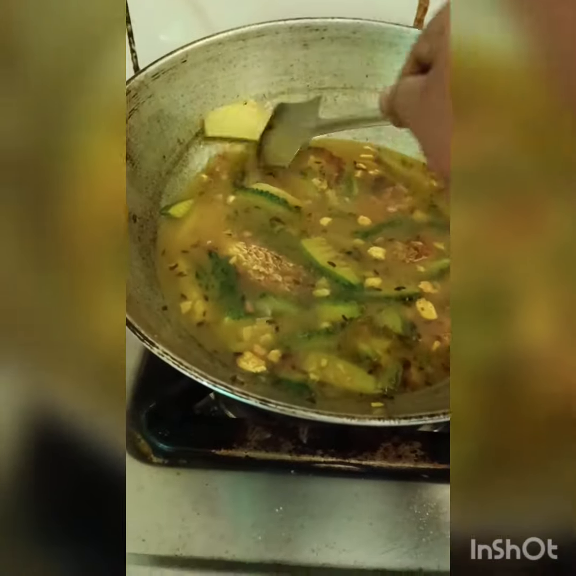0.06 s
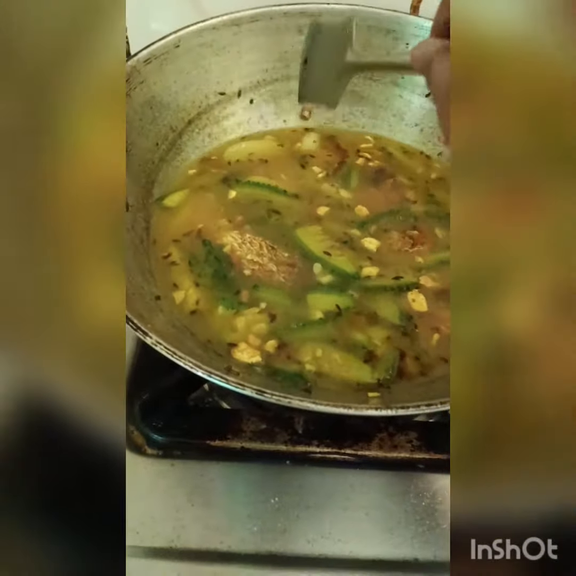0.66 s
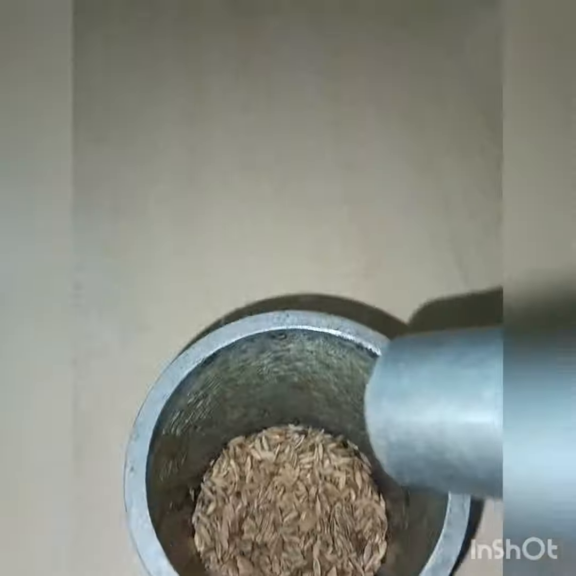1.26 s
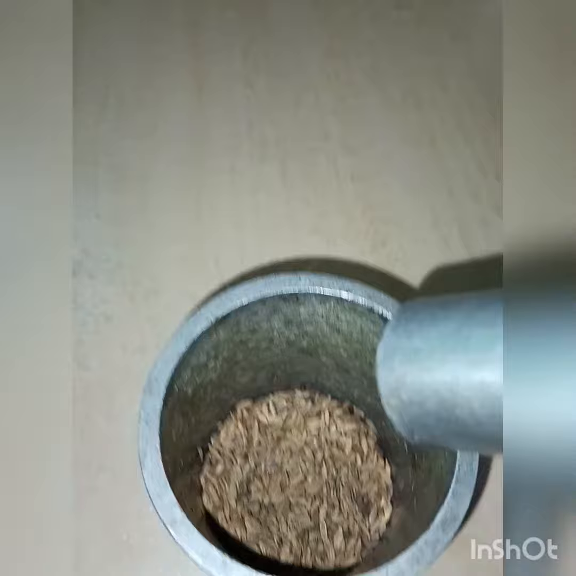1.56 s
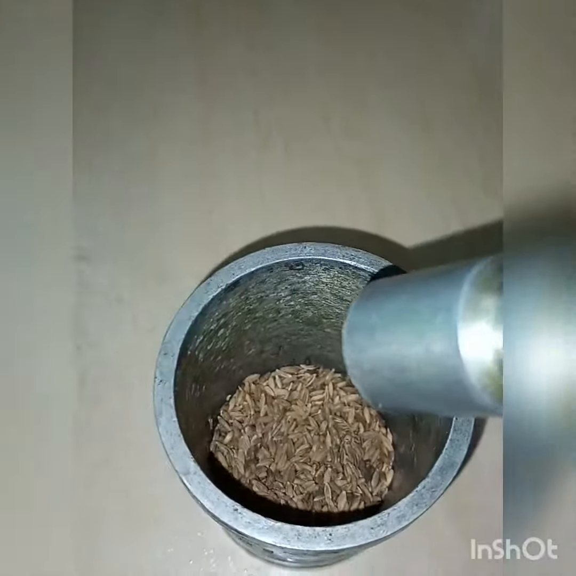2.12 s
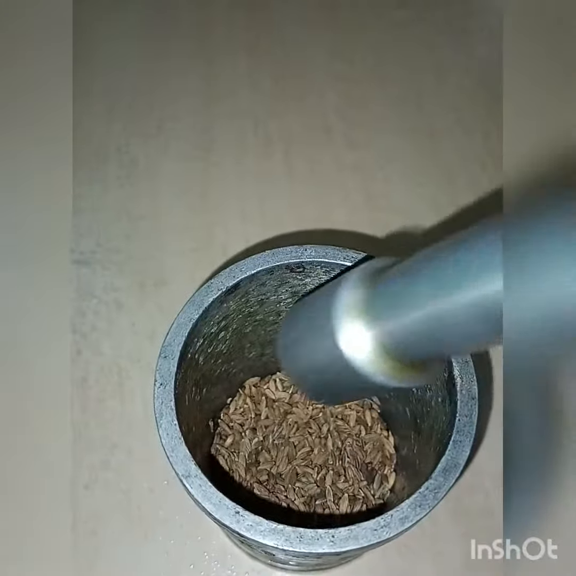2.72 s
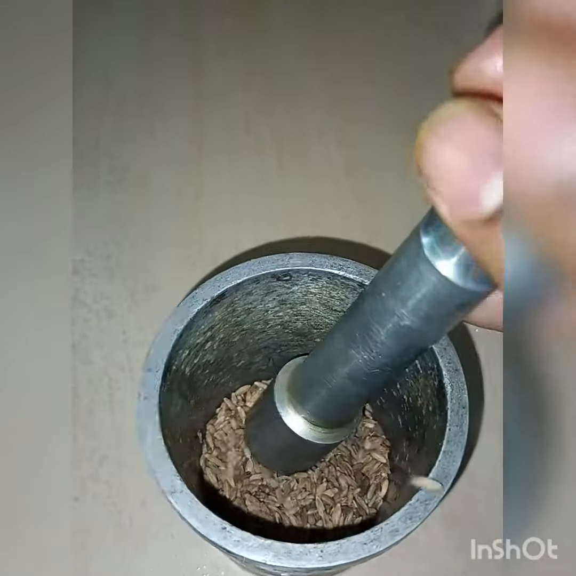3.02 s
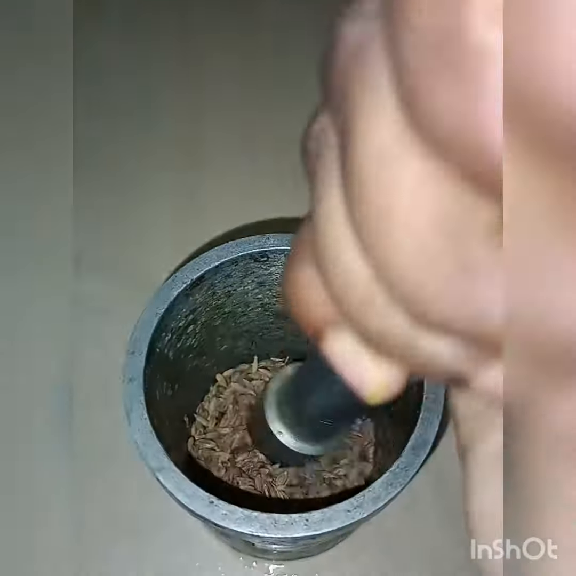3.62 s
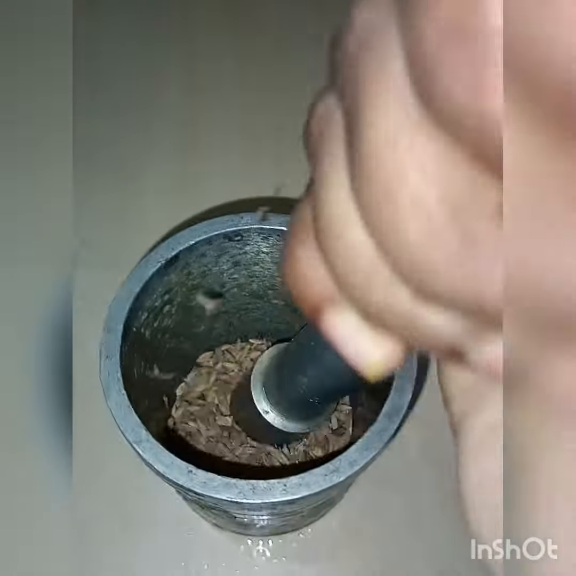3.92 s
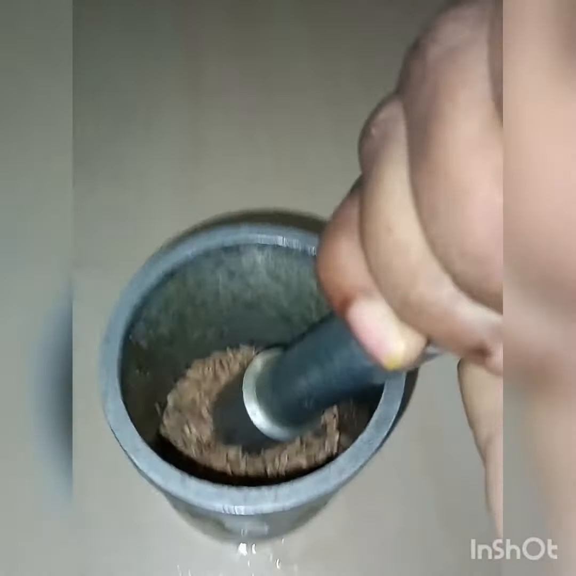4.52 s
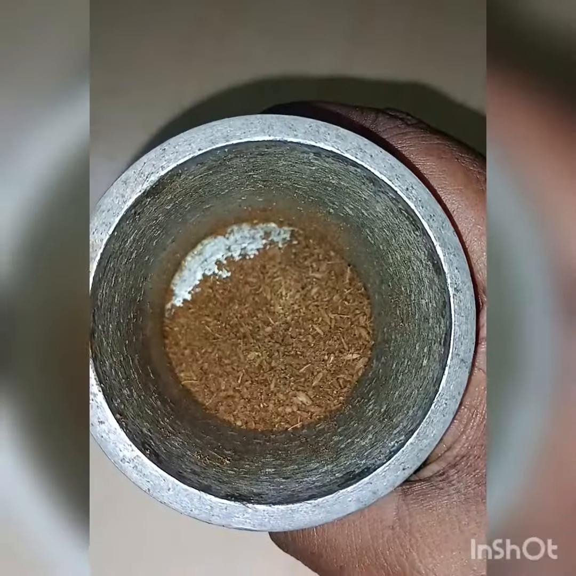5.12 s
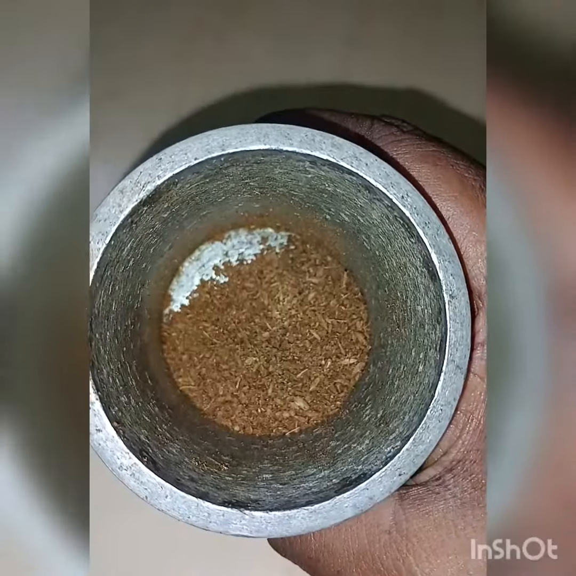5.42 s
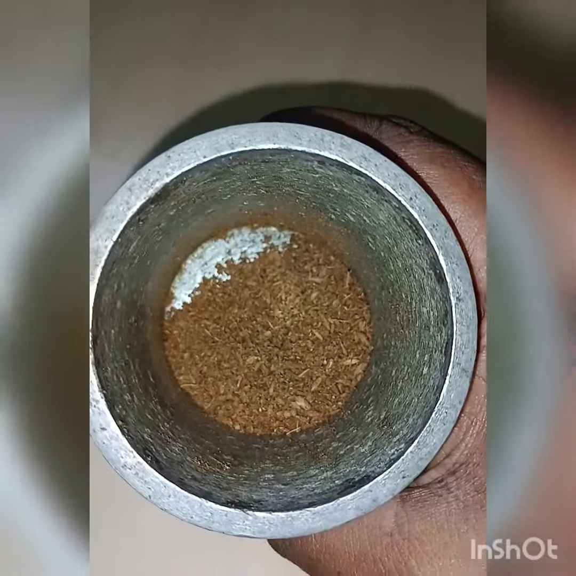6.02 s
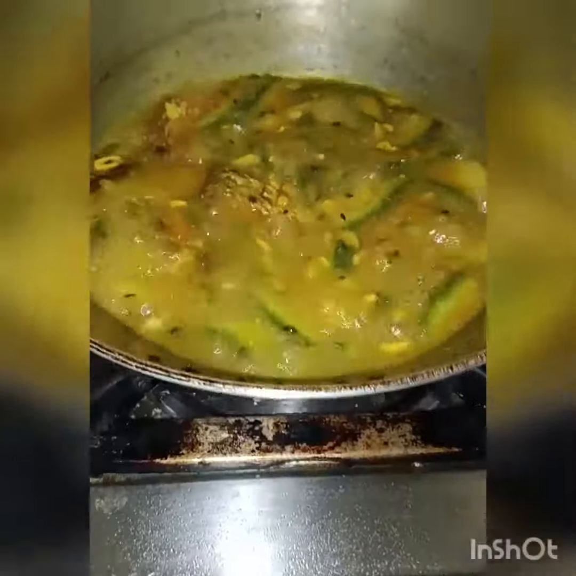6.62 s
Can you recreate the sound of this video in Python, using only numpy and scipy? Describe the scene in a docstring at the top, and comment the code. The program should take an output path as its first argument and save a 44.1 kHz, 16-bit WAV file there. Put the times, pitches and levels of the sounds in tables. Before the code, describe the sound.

Over a kitchen fan's hum, faint wok scrapes give way to a loud metal clang, pestle blows crunching spice, and finally simmering bubbles.

```python
"""Four short moments in a small, hard-walled kitchen. First a spatula scrapes a wok by stick-slip friction
while bubbles ring in the simmering curry. Next a steel pestle clangs on a metal mortar, exciting the modes
of both; the mortar rocks, and the pestle pounds cumin, shaking the counter and at last striking bare metal.
Then the spice lies still and only the background is heard. Finally the curry simmers on, with a few loud
pops. Throughout, a fan gives a turbulent rush and a buzz driven by the alternating mains."""
import sys
import numpy as np
from scipy import signal
from scipy.fft import rfft, irfft
from scipy.io import wavfile
from scipy.ndimage import map_coordinates

SR = 44100
rng = np.random.default_rng(int(sys.argv[2]) if len(sys.argv) > 2 else 0)


def transcribe(signal):
    """Save signal, clipped to [-1, 1], as a 16-bit WAV file at the path in sys.argv[1]."""
    frames = np.atleast_2d(signal).T
    limited = np.clip(frames, -1, 1)
    pcm = np.round(limited * 32767).astype(np.int16)
    wavfile.write(sys.argv[1], SR, pcm)


N = 298116
T = np.arange(N) / SR
RING_T = T[:SR]  # the second after a blow
FREQS = np.fft.rfftfreq(N, 1 / SR) + 1  # Hz, offset to keep the logarithm finite
CLANG_S, CLANG_DB = 2.8839, 0
MAINS_HZ = 50

# pestle blows on the seeds (time [s], force [dB], share reaching bare metal [dB])
BLOWS = [(2.9058, -36, -33), (3.5817, -34, -24.5), (3.912, -27, -41), (4.204, -33.5, -32), (4.2274, -36, 1)]
# the tipped mortar landing on its foot (time [s], level [dB])
LANDINGS = [(2.8951, -8.5), (2.9532, -15)]
# mortar modes (frequency [Hz], t60 [s], level struck on the rim [dB], level struck on the floor [dB])
MORTAR_MODES = [(670, 0.022, -44, -12.5), (1322, 0.015, -27.5, 0), (1830, 0.013, -19, -4.5),
                (2280, 0.017, -28.5, -7), (3290, 0.016, -25, -5), (3853, 0.035, 1, -6),
                (3836, 0.43, -26.5, -44), (3990, .022, -13.5, -1), (4400, 0.043, -39.5, -5),
                (4800, 0.019, -28.5, -6), (5700, 0.051, -28, -21), (6960, .03, -15, -28.5),
                (10163, 0.03, -23.5, -14), (15000, .07, -41, -21)]
# bending modes of the pestle (frequency [Hz], level [dB], t60 [s])
PESTLE_MODES = [(2524, -1.5, .31), (6870, -6, .11), (6926, -2, .16), (10140, -10, .11), (12980, -30, .11)]
# modes of the mortar on its foot (frequency [Hz], level [dB], t60 [s])
FOOT_MODES = [(1258, -5, 0.02), (1396, 0.5, 0.03), (1480, 0.5, 0.016), (1793, -11, 0.029),
              (2540, -6.5, 0.023), (480, -22, 0.028)]
# resonances of seeds cracking in the mortar (frequency [Hz], width [Hz], gain [dB])
SEED_PEAKS = [(490, 810, -1), (1460, 210, 0), (2600, 220, 3.5), (3740, 220, 4), (6140, 1350, -8),
              (6850, 920, -10), (13600, 2500, -21)]
# low modes of the counter top (frequency [Hz], level [dB], t60 [s])
COUNTER_MODES = [(75.5, -12.5, 1), (113.2, 0, 0.75), (124, -4.5, 0.65), (164, -6, 0.61), (266, -13, 0.48),
                 (329, -15, 0.27), (452, -7, .25)]
# spatula strokes (time [s], duration [s], level [dB], emphasised frequency [Hz])
STROKES = [(0.02, 0.055, -35, 1200), (0.184, 0.058, -44.5, 6000), (0.3097, 0.01, -38, 6000)]
# resonances of the loaded wok (frequency [Hz], width [Hz], gain [dB])
WOK_PEAKS = [(653, 94, 6), (1400, 120, 4), (2480, 1030, -8), (3180, 280, -8), (5790, 610, -12.5),
             (7200, 700, -14.5)]
# loudest bursting bubbles (time [s], pitch [Hz], level [dB])
BIG_BUBBLES = [(6.211, 2326, -36), (6.231, 6960, -41), (6.269, 2700, -42), (6.366, 6900, -43),
               (6.626, 2150, -36.5), (6.646, 1907, -34)]
# spectrum of the rush of fan and burner in each moment (frequency [Hz], relative density [dB])
RUSH_WOK = [(30, -30), (60, -18), (105, -1), (200, 0.5), (260, -3.5), (350, 6), (490, -7), (750, -2.5),
            (1650, -7), (2800, -11.5), (3700, -7), (4700, -22.5), (7500, -20), (11000, -35), (15800, -37)]
RUSH_MORTAR = [(30, -33), (60, -22), (100, -3), (190, -2.5), (290, 0.5), (700, -1), (1250, -0.5),
               (1800, -11.5), (3500, -10.5), (4600, -22.5), (7000, -24.5), (10400, -40.5), (13500, -47.5),
               (15800, -35)]
RUSH_STILL = [(30, -40), (60, -22), (100, -8), (190, -3.5), (290, -1.5), (500, -1), (780, -1.5), (1200, -2),
              (1800, -12), (3500, -11.5), (4600, -24), (7500, -29.5), (10400, -42), (15800, -43)]
RUSH_SIMMER = [(30, -36), (60, -20), (109, -1), (240, -7.5), (372, -0.5), (600, -8.5), (1070, -4.5),
               (1500, -13.5), (2900, -14.5), (3600, -8.5), (4300, -32), (7200, -23), (10400, -38),
               (15800, -37)]
# resonances of the buzzing fan in each moment (frequency [Hz], width [Hz], relative gain [dB])
FAN_WOK = [(790, 32, -3), (1710, 200, -10), (2710, 210, -13.5), (3253, 100, -3.5), (5810, 79, -15),
           (6320, 110, -16), (7500, 180, -26), (9080, 200, -24), (11600, 120, -25.5), (12290, 120, -27)]
FAN_MORTAR = [(2970, 51, -1.5), (3153, 137, 0.5), (3510, 420, -12), (5350, 150, -12.5), (5612, 127, -8.5),
              (6120, 25, -10.5), (6300, 100, -11.5), (7400, 120, -16.5), (9690, 160, -30.5),
              (11870, 580, -25), (15150, 300, -44)]
FAN_STILL = [(2480, 110, -10.5), (3168, 60, 4), (3233, 62, 4), (3820, 210, -13.5), (5300, 210, -16),
             (5630, 77, -9), (6130, 24, -6), (6335, 45, -6.5), (7280, 57, -20), (9550, 230, -38),
             (11800, 290, -25.5)]
FAN_SIMMER = [(3190, 116, 4), (5390, 100, -16), (5740, 130, -15), (6150, 47, -12), (7400, 100, -18),
              (9620, 80, -27), (11750, 220, -23)]
# fan motor tones heard at the counter (frequency [Hz], level [dB])
MOTOR_TONES = [(271, -55), (797, -57.5), (1093, -54.5), (1244, -57)]
# reverberation bands of the kitchen (frequency [Hz], t60 [s], level [dB])
ROOM_BANDS = [(250, 1, 2), (1013, 0.11, 0.5), (1970, 0.39, 4), (3700, 0.46, -10.5), (8000, 0.27, -1),
              (14000, .2, -15)]
# the four moments (start [s], end [s], fade-in [s], buzz [dB], whistle pitch [Hz], whistle level [dB])
TIMELINE = [(0, 1.214, .0013, -48, 3198, -61.5), (1.301, 4.689, .26, -47, 3149, -54),
            (4.773, 6.193, 0.13, -44.5, 3243, -55.5), (6.192, 6.77, 0.0018, -43.5, 3199, -46.5)]


def clang(pestle_db=-13, shake_db=-18, wet_db=-4, pestle_wet_db=-12):
    """Impact excitation: struck on the rim, the mortar rings briefly; the pestle's bending modes sing on."""
    hz, t60, rim_db, _ = np.transpose(MORTAR_MODES)
    strike = [(CLANG_S, CLANG_DB)]
    mortar = play(strike, ring(zip(hz, rim_db, t60)) + undb(shake_db) * ring(FOOT_MODES))
    pestle = play(strike, undb(pestle_db) * ring(PESTLE_MODES))
    return mortar + pestle + reverb(undb(wet_db) * mortar + undb(pestle_wet_db) * pestle)


def pounding(crunch_db=9, crack_db=-1, shake_db=-4, jolt_db=-9, thud_db=-.5, thud_lag_s=0.0138, wet_db=-3):
    """Force transmission: each blow passes through seeds and mortar to the counter, whose modes beat."""
    hz, t60, _, floor_db = np.transpose(MORTAR_MODES)
    seeds = undb(crunch_db) * crunch(pushes()) + undb(crack_db) * crunch(knocks())
    shake = undb(shake_db) * play(pushes(), ring(FOOT_MODES))
    metal = play(knocks(), ring(zip(hz, floor_db, t60)) + undb(jolt_db) * ring(FOOT_MODES))
    thud = play([(s + thud_lag_s, db + thud_db) for s, db in pushes()], ring(COUNTER_MODES))
    mortar = seeds + shake + metal
    return mortar + thud + undb(wet_db) * reverb(mortar)


def pushes():
    """Cushioned impact: the weight of each blow, as (time [s], level [dB])."""
    return [(s, force_db) for s, force_db, _ in BLOWS]


def knocks(metal_db=20.5):
    """Hard contact: the part of each blow that the seeds do not cushion, as (time [s], level [dB])."""
    return [(s, force_db + through_db + metal_db) for s, force_db, through_db in BLOWS]


def crunch(events, crush_s=0.0017, grit=0.38):
    """Brittle fracture: at each (time [s], level [dB]) the seeds give way in a burst of resonant noise."""
    crush = RING_T / crush_s * np.exp(1 - RING_T / crush_s)
    cracks = np.zeros(N)
    for s, db in events:
        add(cracks, s, undb(db) * crush * rng.standard_normal(SR) * np.exp(grit * walk(1100)[:SR]))
    return resonate(cracks, SEED_PEAKS)


def rocking(knock_db=-22, pestle_db=-22, seeds_db=-13, wet_db=-8):
    """Restoring torque: tipped by the clang, the mortar clacks back, jolting seeds and pestle."""
    hz, t60, _, floor_db = np.transpose(MORTAR_MODES)
    bowl = undb(knock_db) * ring(zip(hz, floor_db, t60))
    clack = ring(FOOT_MODES) + bowl + undb(pestle_db) * ring(PESTLE_MODES)
    out = play(LANDINGS, clack) + undb(seeds_db) * crunch(LANDINGS)
    return out + undb(wet_db) * reverb(out)


def counter_wash(hard_db=-25, soft_db=-14, t60=0.76, rise_s=0.0028):
    """Modal overlap: the counter's dense modes merge into noise, bright if knocked, dull if cushioned."""
    swell = decay(t60) * (1 - np.exp(-RING_T / rise_s))
    hard = undb(hard_db) * play(knocks(), swell)
    soft = undb(soft_db) * play(pushes(), swell)
    bright = colour(rng.standard_normal(N), [(100, -18.5), (500, 7.5), (1000, 4.5), (2400, -9),
                                             (3000, -15), (5500, -15.5), (9000, -39)])
    dull = colour(rng.standard_normal(N), [(60, -13), (300, -2.5), (700, -4.5), (1500, -27), (5000, -58)])
    return hard * unit(bright) + soft * unit(dull)


def spatula(grit=0.23, slope_db=4, wet_db=-3):
    """Stick-slip friction: short strokes of the steel edge excite the wok's resonances."""
    out = np.zeros(N)
    for s, length, db, hz in STROKES:
        pressure = np.sin(np.pi * np.clip((T - s) / length, 0, 1)) ** 2
        slips = pressure * rng.standard_normal(N) * np.exp(grit * walk(860))
        tilt = [(hz / 10, -3 * slope_db), (hz, 0), (hz * 10, -slope_db)]
        stroke = colour(resonate(slips, WOK_PEAKS), tilt)
        out += undb(db) * stroke * np.sqrt(length * SR / np.sum(stroke ** 2))
    return out + undb(wet_db) * reverb(out)


def wok_rumble(start_s=0.035, length_s=0.4, hz=108, width_hz=30, db=-50):
    """Forced vibration: the wok rumbles on its stand while the spatula pushes it."""
    push = np.sin(np.pi * np.clip((T - start_s) / length_s, 0, 1))
    return undb(db) * push * unit(resonate(rng.standard_normal(N), [(hz, width_hz, 0)]))


def pops(cycles=19, wet_db=-5):
    """Light damping: a few big bubbles ring with a clear pitch, and the walls reflect them."""
    out = np.zeros(N)
    for s, hz, db in BIG_BUBBLES:
        add(out, s, undb(db) * bubble(hz, cycles))
    return out + undb(wet_db) * reverb(out)


def simmer(per_s, db, low_hz, high_hz, spread_db=3, cycles=3.5):
    """Viscous damping: small bubbles burst at random, and the thick curry stills each in a few cycles."""
    out = np.zeros(N)
    for when, pitch, size, life in rng.random((int(per_s * N / SR), 4)):
        hz = low_hz * (high_hz / low_hz) ** pitch
        gain = undb(-spread_db * np.log(0.02 + size)) / (1 + pitch)
        add(out, when * N / SR, gain * bubble(hz, cycles * (.5 + life)))
    return undb(db) * unit(out)


def bubble(hz, cycles, glide=0.055):
    """Cavity resonance: a bursting bubble rises in pitch and decays by 1/e in the given cycles."""
    age = np.arange(int(4 * cycles * SR / hz)) * hz / (cycles * SR)  # in decay times
    envelope = np.exp(-age) * (1 - np.exp(-12 * age))
    return envelope * np.sin(2 * np.pi * cycles * (age + glide * age ** 2 / 4))


def air_rush(spectrum, flutter_db=1.5, swell_db=0.86):
    """Turbulence: broadband noise whose octaves flutter independently while the whole slowly swells."""
    noise = rfft(colour(rng.standard_normal(N), spectrum))
    octaves = np.arange(6, 15)  # log2 of frequency
    bands = (irfft(noise * np.interp(np.log2(FREQS), octaves, share), N) for share in np.eye(len(octaves)))
    fluttering = sum(band * undb(flutter_db * walk(31)) for band in bands)
    return unit(fluttering * undb(swell_db * walk(2.6)))


def fan_buzz(peaks, uneven=0.43, waver=0.82, drift_hz=8, jitter_s=.000012):
    """Multipath interference: iron snaps twice per mains cycle, and turning blades shift the sound paths."""
    instants = np.arange(0, N, SR // (2 * MAINS_HZ))
    snaps = np.zeros(N)
    snaps[instants] = 1 + uneven * (-1) ** np.arange(len(instants))
    # each path scatters the snaps in time but keeps their pitch
    period = SR // MAINS_HZ
    scatters = [irfft(np.exp(2j * np.pi * rng.random(period // 2 + 1))) for _ in range(3)]
    paths = np.array([unit(signal.fftconvolve(snaps, scatter)[:N]) for scatter in scatters])
    # the paths trade strength, so single harmonics waver while the whole stays level
    shares = np.array([np.ones(N), waver * walk(drift_hz), waver * walk(drift_hz)])
    drive = np.sum(paths * shares, axis=0) / np.linalg.norm(shares, axis=0)
    # moving air jitters the arrival, which blurs the highest harmonics most
    arrival = T + jitter_s * walk(2 * drift_hz)
    drive = map_coordinates(drive, [arrival * SR], order=3, mode="nearest")
    rattle = .45 * rng.standard_normal(N)
    return unit(resonate(drive + rattle, peaks))


def fan_tone(hz, db, waver_db=2, waver_rad=1.18):
    """Random modulation: one tone of the fan motor wavers in amplitude and phase."""
    amplitude = undb(db + waver_db * walk(7.3)) * np.sqrt(2)
    return amplitude * np.sin(2 * np.pi * hz * T + waver_rad * walk(8.8))


def reverb(x, delay_s=.004, build_s=0.0069):
    """Diffuse reverberation: dense wall reflections die away at a separate rate in each band."""
    hz, t60, db = np.transpose(ROOM_BANDS)
    noise, tail = rfft(rng.standard_normal(N)), 0
    for k, share in enumerate(np.eye(len(hz))):
        band = irfft(noise * np.interp(np.log(FREQS), np.log(hz), share), N)[:SR]
        envelope = decay(t60[k]) * np.clip((RING_T - delay_s) / build_s, 0, 1)
        tail = tail + undb(db[k]) * band * envelope / np.linalg.norm(envelope)
    return signal.fftconvolve(x, tail)[:N]


def ring(modes):
    """Free vibration: a sum of damped modes, successive ones starting in opposite directions."""
    return sum((-1) ** k * undb(db) * decay(t60) * np.sin(2 * np.pi * hz * RING_T)
               for k, (hz, db, t60) in enumerate(modes))


def decay(t60):
    """Exponential damping: a fall of 60 dB in t60 seconds."""
    return np.exp(-np.log(1000) * RING_T / t60)


def resonate(x, peaks):
    """Resonance: x passes through steep parallel peaks (frequency [Hz], width [Hz], gain [dB])."""
    gain = sum(undb(db) / (1 + 1j * (FREQS - hz ** 2 / FREQS) / (1.27 * width)) ** 2
               for hz, width, db in peaks)
    return irfft(rfft(x, N) * gain, N)


def colour(x, points):
    """Spectral shaping: x is filtered by a curve through (frequency [Hz], gain [dB])."""
    hz, db = np.transpose(points)
    return irfft(rfft(x, N) * undb(np.interp(np.log(FREQS), np.log(hz), db)), N)


def walk(rate_hz):
    """Random fluctuation: low-passed noise of rms 1."""
    return unit(irfft(rfft(rng.standard_normal(N)) * np.exp(-np.minimum(FREQS / rate_hz, 10) ** 2), N))


def play(events, sound):
    """Time invariance: the same response follows each (time [s], level [dB])."""
    out = np.zeros(N)
    for s, db in events:
        add(out, s, undb(db) * sound)
    return out


def add(out, s, x):
    """Superposition: x joins out from time s."""
    i = max(int(s * SR), 0)
    out[i:i + len(x)] += x[:max(N - i, 0)]


def unit(x):
    """Normalisation to rms 1."""
    return x / np.sqrt(np.mean(x ** 2))


def undb(db):
    """Amplitude ratio of a level in decibels."""
    return 10 ** (np.asarray(db) / 20)


def scene():
    """Superposition: each moment sums its action, rush, buzz and whistle, fades in and ends abruptly."""
    motor = sum(fan_tone(hz, db) for hz, db in MOTOR_TONES)
    stirring = spatula() + wok_rumble() + simmer(per_s=240, db=-60, low_hz=576, high_hz=5800)
    grinding = clang() + rocking() + pounding() + counter_wash()
    bubbling = pops() + simmer(per_s=1100, db=-49, low_hz=1490, high_hz=8900)
    actions = [stirring, grinding + motor, motor, bubbling]
    rushes = [RUSH_WOK, RUSH_MORTAR, RUSH_STILL, RUSH_SIMMER]
    buzzes = [FAN_WOK, FAN_MORTAR, FAN_STILL, FAN_SIMMER]
    out = np.zeros(N)
    for moment, action, spectrum, peaks in zip(TIMELINE, actions, rushes, buzzes):
        start, end, fade, buzz_db, whistle_hz, whistle_db = moment
        gate = (T >= start) * (T < end) * np.clip(0.17 + (T - start) / fade, 0, 1)
        rush = undb(-43) * air_rush(spectrum)
        buzz = undb(buzz_db) * fan_buzz(peaks)
        whistle = fan_tone(whistle_hz, whistle_db)
        out += gate * (action + rush + buzz + whistle)
    return out[None]


def record(dry, ceiling=.95, cutoff_hz=15800):
    """Clipping and band limiting: the loudest peaks are flattened, then the highest treble is cut."""
    oversampled = signal.resample_poly(dry, 2, 1, axis=1)
    limited = signal.resample_poly(np.clip(oversampled, -ceiling, ceiling), 1, 2, axis=1)
    return signal.sosfilt(signal.ellip(10, .2, 70, cutoff_hz, fs=SR, output="sos"), limited)


dry = scene()
out = record(dry)
transcribe(out)
```